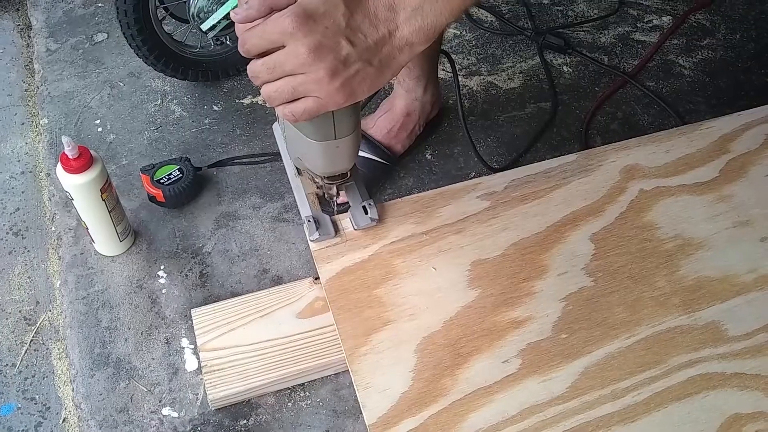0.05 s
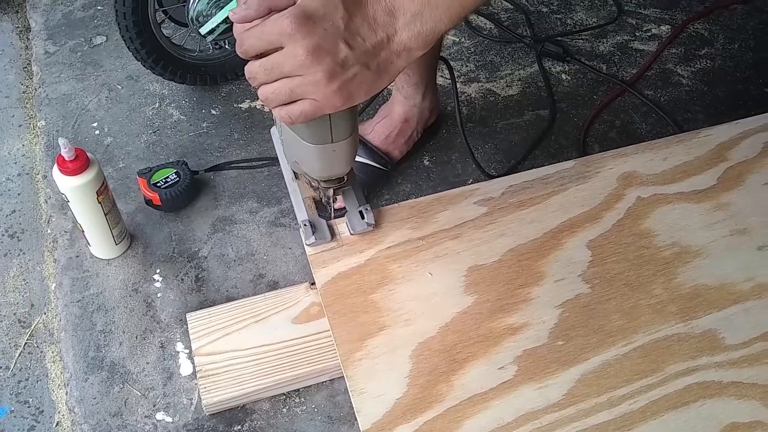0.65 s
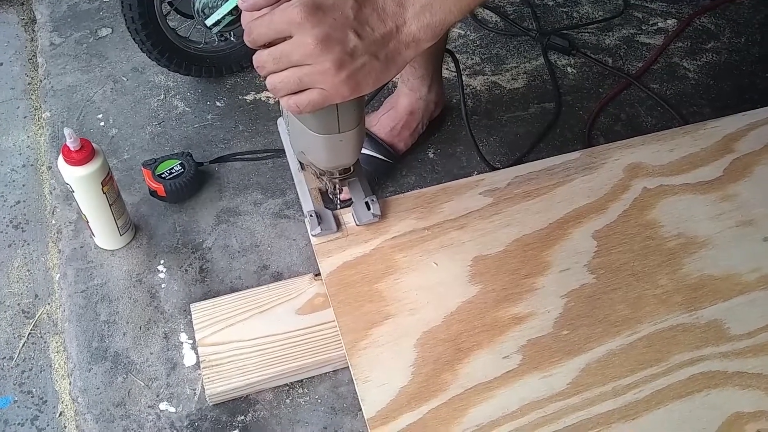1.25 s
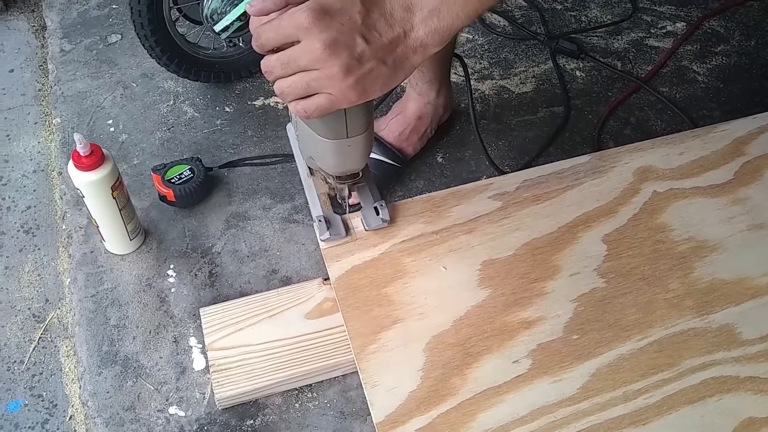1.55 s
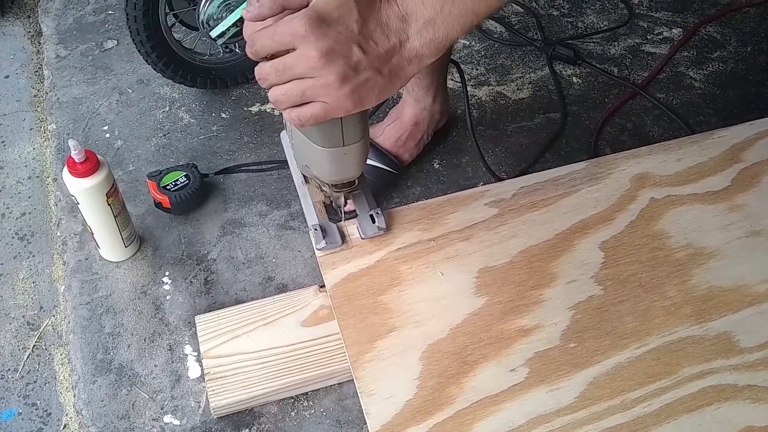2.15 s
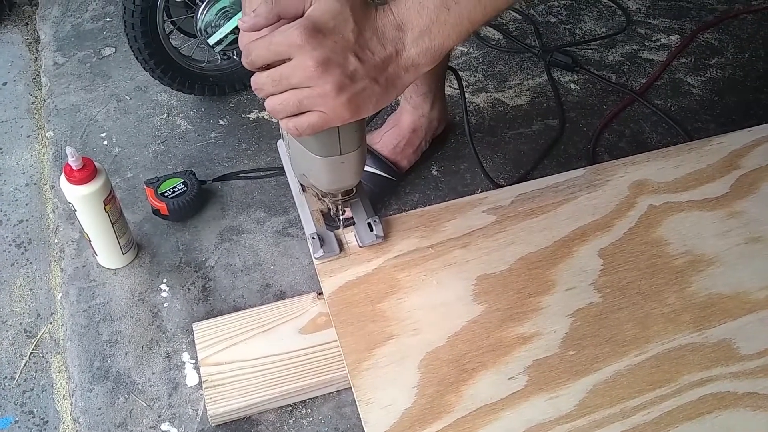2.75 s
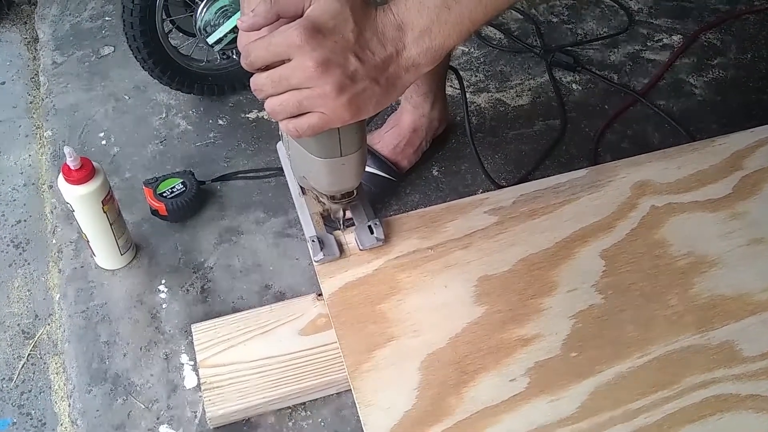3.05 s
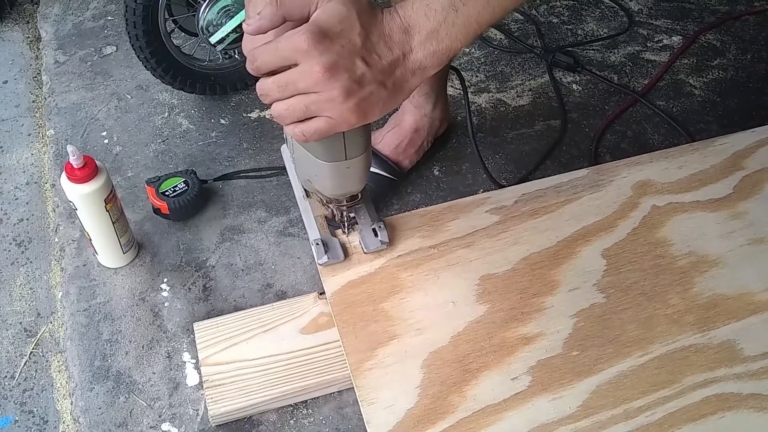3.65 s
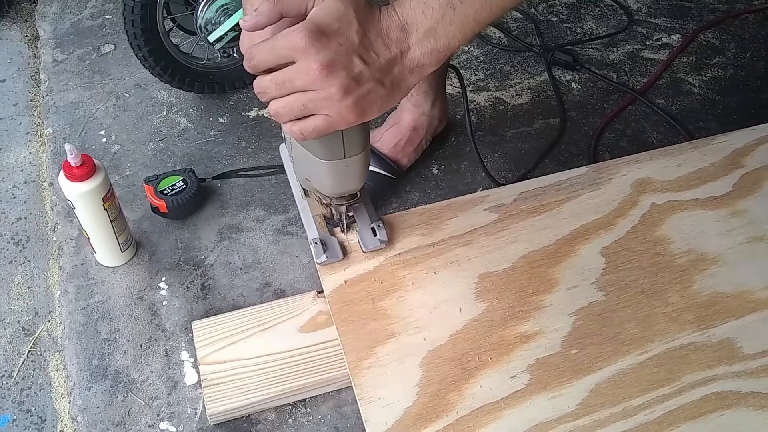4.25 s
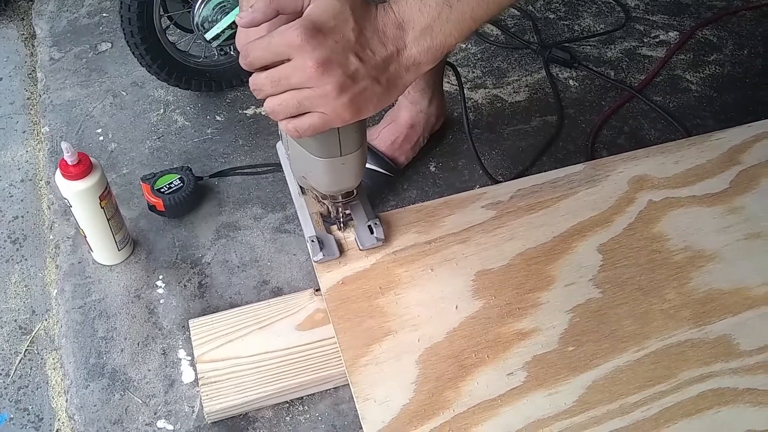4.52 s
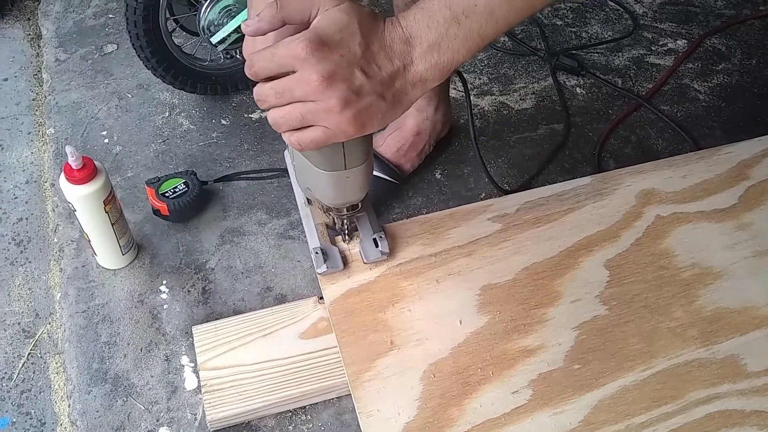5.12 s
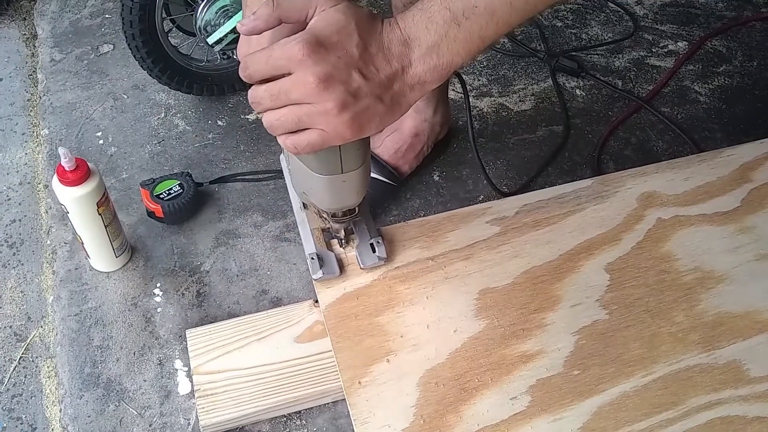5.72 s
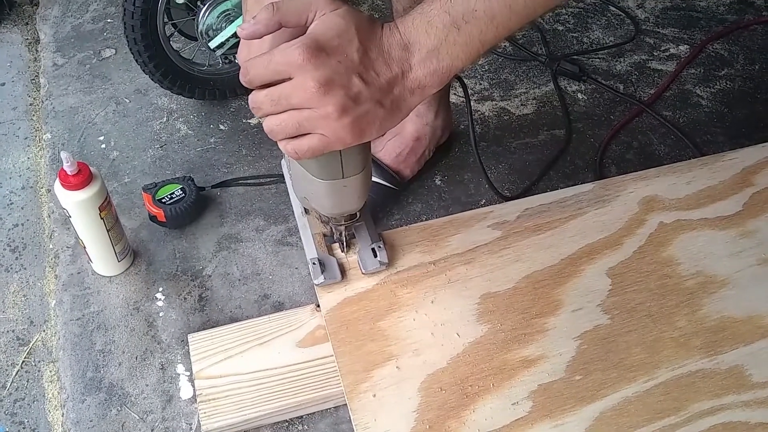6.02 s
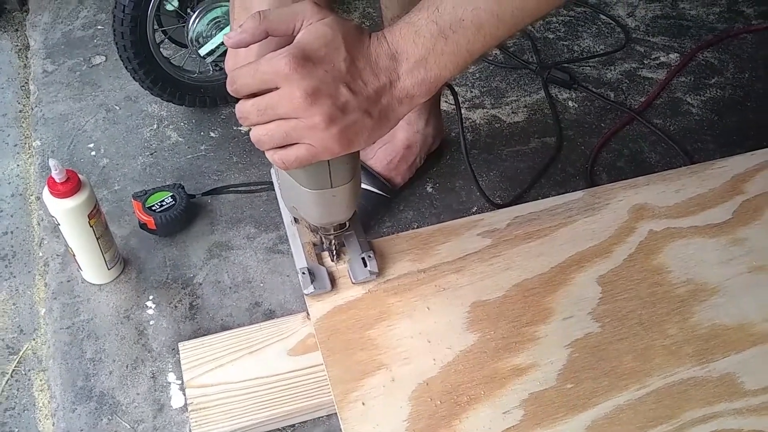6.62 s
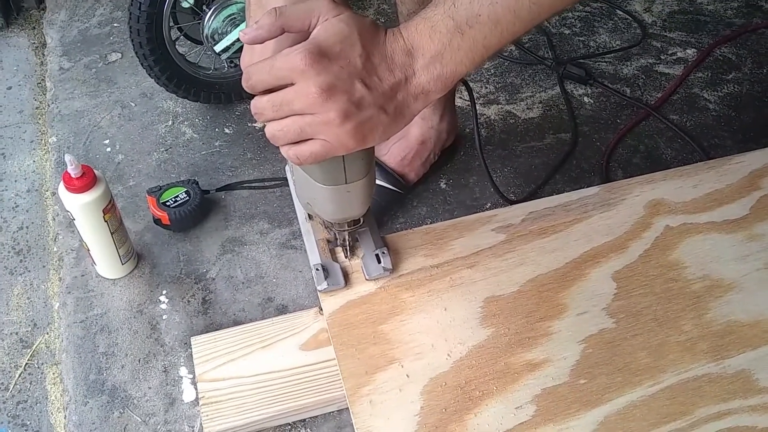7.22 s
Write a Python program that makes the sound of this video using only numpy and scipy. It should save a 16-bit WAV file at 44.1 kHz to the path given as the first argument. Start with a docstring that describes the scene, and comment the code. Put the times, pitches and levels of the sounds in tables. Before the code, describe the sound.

An electric jigsaw runs lightly against a plywood sheet with a rubbing hiss, a low hum and a rising whine. After about a second and a half the blade bites and starts a fast, thumping chatter, its teeth rasping and crackling while the steel shoe rings. Splinters crack off. The strokes slow midway, the pinched blade squeaks, then it speeds up again with a thin rattle. The sound is close, in a workshop.

```python
"""A rubbing hiss and a rising whine: an electric jigsaw runs lightly on a plywood sheet in a workshop.
At 1.6 s the blade bites. From then on, 9-16 times a second, its teeth rasp and crackle through the wood
and knock the sheet and the saw's steel shoe into ringing. Splinters crack off the veneer, and the blade
sometimes squeaks where the kerf pinches it. A nearby phone's stereo widening combs mid and side."""
import sys
import numpy as np
from scipy import signal
from scipy.fft import rfft, irfft
from scipy.io import wavfile

SR = 44100
rng = np.random.default_rng(int(sys.argv[2]) if len(sys.argv) > 2 else 0)


def dump_mix(stems):
    """Bounce the given channels to the path in sys.argv[1] as a 16-bit WAV at rate SR."""
    frames = np.atleast_2d(stems).T  # one column per channel
    limited = np.clip(frames, -1, 1)  # hard clip at full scale
    pcm = np.round(limited * 32767).astype(np.int16)
    wavfile.write(sys.argv[1], SR, pcm)


N = 329868
TIME_S, BINS_HZ = np.arange(N) / SR, np.arange(N // 2 + 1) * SR / N
BITE_S = 1.6
WOOD_BAND_HZ, TEETH_BAND_HZ = (450, 1500), (7000, 13000)


def undb(db):
    """Decibels to gain."""
    return 10 ** (np.asarray(db) / 20)


def over_time(table, column=1):
    """Table column interpolated at every sample."""
    table = np.array(table, float)
    return np.interp(TIME_S, table[:, 0], table[:, column])


def over_hz(table, column=1):
    """Table column interpolated at every bin, in log frequency."""
    table = np.array(table, float)
    return np.interp(np.log(BINS_HZ + 1), np.log(table[:, 0]), table[:, column])


def add(out, start_s, x):
    """Mix x into out at start_s."""
    i = int(start_s * SR)
    out[..., i:i + x.shape[-1]] += x[..., :max(N - i, 0)]


def tint(x, spectrum, band_hz):
    """Colour white noise; unit power in gives unit power inside the band."""
    gain = undb(over_hz(spectrum))
    in_band = (BINS_HZ > band_hz[0]) & (BINS_HZ < band_hz[1])
    return irfft(rfft(x) * gain / np.sqrt(np.mean(gain ** 2 * in_band)), N)


def walk(rate_hz):
    """Smooth random signal, spread near 1."""
    return 1.44 * np.interp(TIME_S * rate_hz, np.arange(N // 8), rng.standard_normal(N // 8))


def grit(grain_db, rate_hz):
    """Stereo noise, both channels broken into the same short grains."""
    grains = undb(grain_db * np.clip(walk(rate_hz), -3, 3))
    return rng.standard_normal((2, N)) * grains / np.sqrt(np.mean(grains ** 2))


def rough_tone(hz, flutter_hz):
    """Narrow-band noise around a pitch curve."""
    phase = 2 * np.pi * np.cumsum(hz) / SR
    return walk(flutter_hz) * np.cos(phase) + walk(flutter_hz) * np.sin(phase)


def bursts(times_s, levels_db, lead_s, rise_s, hold_s, fall_s, tail_db, tail_s):
    """Envelope of bursts, each starting lead_s early: rise, hold, fast fall plus a faint tail."""
    t, out = np.arange(SR // 8) / SR, np.zeros(N)
    after_s = np.maximum(t - hold_s, 0)
    decay = np.exp(-after_s / fall_s) + undb(tail_db) * np.exp(-after_s / tail_s)
    shape = np.minimum(t / rise_s, 1) * decay
    for at_s, db in zip(times_s, levels_db):
        add(out, at_s - lead_s, undb(db) * shape)
    return out


def ring(force, modes, spread_rad):
    """Damped modes; neighbours reach the two channels with opposite phase offsets."""
    t, response = np.arange(SR // 2) / SR, 0
    for k, (hz, db, t60_s) in enumerate(modes):
        offset = (-1) ** k * spread_rad * np.array([[1], [-1]])
        decay = np.exp(-np.log(1000) * t / t60_s)
        response = response + undb(db) * decay * np.cos(2 * np.pi * hz * t + offset)
    return signal.fftconvolve(np.atleast_2d(force), response, axes=1)[:, :N]


def diffuse(x, share, decay_s):
    """Countless high modes turn a share of the power into a short, dense ring."""
    t = np.arange(SR // 6) / SR
    tail = rng.standard_normal((1, len(t))) * np.exp(-t / decay_s)
    wet = signal.fftconvolve(x, tail, axes=1)[:, :N]
    return np.sqrt(1 - share) * x + np.sqrt(share / np.sum(tail ** 2)) * wet


# Blade speed, sagging as the kerf pinches. Each row: time in seconds, strokes per second.
STROKE_RATE = [(1.6, 12.52), (2.84, 12.83), (2.93, 12.3), (3.07, 12.2), (3.25, 11.2), (3.43, 10.1),
               (3.78, 8.74), (4.3, 10.97), (4.72, 13.22), (5.38, 14.33), (5.63, 13.38), (5.78, 14.75),
               (6.24, 14.71), (6.58, 15.36), (7.48, 15.58)]

def stroke_count():
    """Strokes since the bite; whole numbers fall on the knocks."""
    return np.cumsum(over_time(STROKE_RATE) * (TIME_S >= BITE_S)) / SR


def swing_db(depth_db, lag_rad):
    """Level swing, one cycle per stroke, from the bite on."""
    return (TIME_S > BITE_S) * depth_db * np.cos(2 * np.pi * stroke_count() - lag_rad)


def stroke_window(centre, width):
    """Bell-shaped window in each stroke; centre and width are fractions of a stroke."""
    return (TIME_S > BITE_S) * np.exp(-((stroke_count() % 1 - centre) / width) ** 2)


# Hum partials. Each row: frequency in Hz, level in dB.
HUM_PARTIALS = [(55.5, -59), (111, -62), (167, -45.5), (293, -46.5)]

def hum(gain_db=-3):
    """The lightly loaded saw hums, wavering, until the blade bites."""
    warped_s = np.cumsum(1 + 0.013 * walk(18)) / SR
    gate = np.clip((BITE_S - TIME_S) / 0.032 + 1, 0, 1)
    partials = sum(undb(db + gain_db + 0.83 * walk(10.3)) * np.sin(2 * np.pi * hz * warped_s)
                   for hz, db in HUM_PARTIALS)
    return np.sqrt(2) * gate * partials


# Motor run-up. Each row: time in seconds, pitch in Hz, level in dB.
RUN_UP = [(0, 525, -62), (.19, 560, -35.5), (.31, 572, -54), (.41, 631, -57), (.62, 694, -47),
          (.66, 765, -44), (.695, 790, -29), (.73, 812, -51), (.82, 847, -55), (.95, 859, -47),
          (1.3, 898, -43), (1.6, 925, -41), (1.7, 940, -80)]

def motor_whine(gain_db=-2, octave_db=-5, waver=0.00695, roughness=0.71):
    """The whine climbs as the motor gathers speed; its octave fades as the blade nears the wood."""
    hz = over_time(RUN_UP) * (1 + waver * walk(40.5))
    phase = 2 * np.pi * np.cumsum(hz) / SR
    octave = undb(octave_db) * np.clip((BITE_S - TIME_S) / 0.34, 0, 1) * np.sin(2 * phase)
    db = over_time(RUN_UP, 2) + gain_db + 1.2 * walk(24.2)
    return undb(db) * (np.sqrt(2) * (np.sin(phase) + octave) + roughness * rough_tone(hz, 60.06))


# Rattle in the blade guide. Each row: time in seconds, level in dB.
RATTLE_LEVELS = [(4.7, -62), (5.25, -47.5), (6.2, -52), (7.48, -53.5)]

def blade_rattle(hz=3200.0):
    """Freed by the kerf, the blade rattles in its guide and rings with every stroke."""
    db = over_time(RATTLE_LEVELS) + swing_db(5, lag_rad=-0.11) + 4.9 * walk(250)
    return undb(db) * rough_tone(np.full(N, hz), flutter_hz=900)


# Rubbed blade resonance. Each row: time in seconds, pitch in Hz, level in dB.
BLADE_RESONANCE = [(0, 10380, -37), (1.55, 9900, -36.5), (1.7, 10080, -69), (3.8, 9800, -60),
                   (4.25, 8180, -44), (5.1, 8200, -44.5), (6.8, 8280, -35.5), (7.48, 7710, -38)]

def blade_sizzle(gain_db=-1.5):
    """Rubbing sets one blade resonance singing, most near the end of each stroke."""
    hz = over_time(BLADE_RESONANCE)
    db = over_time(BLADE_RESONANCE, 2) + gain_db + swing_db(4.5, lag_rad=-0.24) + 3 * walk(150)
    return undb(db) * np.array([rough_tone(hz, flutter_hz=1700) for _ in range(2)])


# Friction as the saw is pushed along. Each row: time in seconds, rub in dB, hiss in dB.
FRICTION_LEVELS = [(0, -30.5, -35), (0.17, -27.5, -31.5), (0.245, -30, -30.5), (0.32, -27, -26),
                   (0.38, -30, -32), (0.46, -32, -29.5), (0.6, -28.5, -28.5), (0.705, -31.5, -26.5),
                   (0.735, -35.5, -34), (1.13, -31, -28), (1.42, -33.5, -30), (1.58, -29, -25),
                   (1.63, -38, -35), (3, -38.5, -32), (3.68, -35, -30), (3.85, -39.5, -35.5),
                   (5.38, -35, -30.5), (5.6, -37, -34), (5.95, -33.5, -30), (6.4, -35.5, -32),
                   (6.88, -31.5, -27), (7.48, -33, -30.5)]
# Rub and hiss spectra. Each row: frequency in Hz, density in dB.
RUB_SPECTRUM = [(25, -14), (60, -15), (100, -5), (130, -9), (165, -1), (260, 7.5), (380, 0), (520, 3),
                (750, 2.5), (1100, 2.5), (1550, 1.5), (2000, 3), (2900, -1.5), (4000, -11), (6000, -19)]
HISS_SPECTRUM = [(1500, -32), (2100, -37), (2750, 2.5), (3500, 0.5), (4200, -0.7), (5500, 1.5), (7000, 0.5),
                 (8300, 0), (10800, 3), (12500, -0.5), (13500, -3.5), (14300, -28)]

def friction(gain_db=-1, return_db=4, fast_strokes_per_s=14):
    """The saw rubs on the wood, teeth and fan hiss; a fast blade also scrapes on its way back."""
    fast = np.clip((over_time(STROKE_RATE) - fast_strokes_per_s) / 0.1, 0, 1)
    scrape_db = return_db * fast * stroke_window(centre=0.663, width=0.098)
    rub_db = over_time(FRICTION_LEVELS) + swing_db(2.5, lag_rad=0.038) + scrape_db + 1.24 * walk(45)
    hiss_db = over_time(FRICTION_LEVELS, 2) + swing_db(1.26, lag_rad=0.073) + 1.56 * walk(60)
    rub = tint(grit(1.2, 500) * undb(rub_db + gain_db), RUB_SPECTRUM, WOOD_BAND_HZ)
    hiss = tint(grit(1.67, 1200) * undb(hiss_db + gain_db), HISS_SPECTRUM, TEETH_BAND_HZ)
    return diffuse(rub + hiss, share=0.11, decay_s=0.018)


# Sheet bending modes, then the higher modes of shoe and sheet.
# Each row: frequency in Hz, level in dB, T60 in seconds.
SHEET_MODES = [(165, 9, 0.31), (188.6, 5.5, 0.22), (227, 4.5, 0.14), (250, -4.5, 0.36), (280.3, 7, 0.16)]
SHOE_MODES = [(336, -1, 0.12), (381, 0.5, 0.15), (433, -2, 0.21), (555, 2, 0.11), (591, 0, 0.082),
              (641, -5, 0.17), (672, -3.5, 0.13), (770, -22, 0.04), (911, -5, 0.13), (1120, 2.5, 0.06),
              (1210, -22, 0.055), (1515, 4.5, 0.014)]
# Chatter of sheet against shoe. Each row: time in seconds, force in dB.
JUDDER_FORCE = [(0, -38.5), (.75, -55), (1.45, -47), (1.7, -34.5), (3.25, -30.5), (3.52, -28.5),
                (3.7, -31.5), (3.8, -30.5), (4.6, -38), (5.3, -32.5), (5.7, -37), (7.48, -31.5)]

def judder(gain_db=-2, shoe_db=-7, clatter_db=-11, clatter_hz=440):
    """The sheet chatters under the shoe; hard blows lift the shoe and add a dry, woody clatter."""
    force_db = over_time(JUDDER_FORCE)
    blows = grit(3.5, 250)[0] * undb(force_db + gain_db + swing_db(4, lag_rad=1.38))
    sheet = ring(blows, SHEET_MODES, spread_rad=0.59)
    shoe = ring(blows, SHOE_MODES, spread_rad=1.0)
    hard_blows = blows * np.clip((force_db - np.median(force_db)) / 8, 0, 1)
    band = signal.iirpeak(clatter_hz, Q=1.05, fs=SR)
    clatter = signal.lfilter(*band, signal.lfilter(*band, hard_blows))
    parts = (sheet, 0), (shoe, shoe_db), (clatter, clatter_db)
    return np.std(blows) * sum(undb(db) * part / np.std(part) for part, db in parts)


# Note of the steel shoe. Each row: time in seconds, level in dB.
CLANG_LEVELS = [(1.6, -28.5), (1.68, -36.5), (1.8, -32.5), (2.4, -29), (3.1, -31.5), (3.5, -34.5),
                (3.8, -33), (4.1, -42), (4.7, -36.5), (5.5, -46), (7.48, -48)]

def shoe_clang(times_s, hz=936, scatter_hz=3.5, lead_s=0.006, rise_s=0.0062, t60_s=0.18, free_s=0.09):
    """Each knock rings one clear note from the shoe until it settles back on the wood."""
    t, out = np.arange(SR // 10) / SR, np.zeros(N)
    amplitude = np.sqrt(2) * undb(over_time(CLANG_LEVELS))
    choke = np.exp(-np.maximum(t - free_s, 0) / 0.016)
    shape = np.minimum(t / rise_s, 1) * np.exp(-np.log(1000) * t / t60_s) * choke
    for at_s, (detune, phase) in zip(times_s, rng.standard_normal((len(times_s), 2))):
        note = np.sin(2 * np.pi * ((hz + scatter_hz * detune) * t + phase))
        add(out, at_s - lead_s, amplitude[int(at_s * SR)] * shape * note)
    return out


def chirp_rows(times_s, from_s=5.75, lead_s=0.012, length_s=0.00825, db=-25.5, hz=7980, scatter_hz=279):
    """Running freely, the blade chirps faintly ahead of each knock. Rows as in PINCHES."""
    late_s = times_s[times_s > from_s]
    return [(at_s - lead_s, length_s, db + scatter_db, hz + scatter_hz * first, hz + scatter_hz * last)
            for at_s, (scatter_db, first, last) in zip(late_s, rng.standard_normal((len(late_s), 3)))]


# Kerf pinches. Each row: start in seconds, length in seconds, level in dB, first and last pitch in Hz.
PINCHES = [(3.9775, 0.0081, -15.5, 8840, 9850), (4.0805, 0.0081, -11.5, 8900, 9500),
           (4.1775, 0.0066, -6, 8520, 7900), (4.2703, 0.0067, -7, 8200, 8150),
           (4.358, 0.0076, -9, 8960, 7840), (4.4435, 0.0067, -8.5, 10090, 6940),
           (4.5268, 0.0061, -7.5, 9800, 7480), (4.608, 0.0058, -10, 10900, 7670),
           (4.686, 0.0055, -5.5, 9130, 8070), (4.762, 0.0061, -6.5, 10270, 7200),
           (4.8375, 0.005, -6, 8930, 7950), (5.9865, 0.0038, -11.5, 9000, 8050),
           (6.056, 0.0045, -16, 9000, 8300), (7.047, 0.0045, -13.5, 8200, 7850)]
# Scrape within a squeak. Each row: frequency in Hz, density in dB.
SCRAPE_SPECTRUM = [(3000, -28), (6500, -18), (7600, 7), (9800, -4), (11500, -20), (14000, -17)]

def squeaks(times_s, gain_db=-3, waver_hz=230, beat_hz=720, partner_db=-10, scrape_db=-13, echo_db=-11):
    """The pinched blade screeches in two beating modes: it swells, bends, snaps off and echoes."""
    rows = PINCHES + chirp_rows(times_s)
    tone, grip = np.zeros(N), np.zeros(N)
    for start_s, length_s, db, first_hz, last_hz in rows:
        progress = np.linspace(0, 1, int(length_s * SR))
        knots = rng.standard_normal(10)
        waver = np.interp(progress, np.linspace(0, 1, len(knots)), knots)
        hz = first_hz + (last_hz - first_hz) * progress + waver_hz * waver
        release = np.minimum((1 - progress) * length_s / 0.0007, 1)
        swell = undb(db + gain_db) * np.minimum(progress / 0.62, 1) ** 1.4 * release
        phase = 2 * np.pi * np.cumsum(hz) / SR
        beat = 2 * np.pi * (beat_hz * length_s * progress + knots[0])
        partner = undb(partner_db) * np.sin(phase + beat)
        add(tone, start_s, np.sqrt(2) * swell * (np.sin(phase) + partner))
        add(grip, start_s, swell)
    grip_flutter = 1 + 0.35 * np.tanh(walk(2500))
    scrape = tint(grip * rng.standard_normal(N), SCRAPE_SPECTRUM, TEETH_BAND_HZ)
    direct = tone * grip_flutter + undb(scrape_db) * scrape
    echo = np.vstack([diffuse(direct[None], share=1, decay_s=0.06) for _ in range(2)])
    return direct * np.array([[1.05], [0.55]]) + undb(echo_db) * echo


# Splinter cracks. Each row: time in seconds, length in seconds, level in dB.
CRACKS = [(1.598, 0.0014, -16), (1.679, .0012, -27), (1.7495, 0.0011, -12.5), (1.8305, .0015, -14),
          (2.067, .002, -21), (2.2255, 0.0022, -14.5), (2.307, .002, -19), (2.386, .0012, -15),
          (2.462, .0015, -19), (2.701, .002, -19), (2.778, .002, -16), (2.854, .003, -18),
          (2.937, .003, -20), (3.019, 0.0056, -18.5), (3.189, .0035, -11), (3.194, 0.0037, -17),
          (3.509, .0012, -15), (3.5268, 0.0023, -11), (3.558, .0012, -17), (3.932, .0012, -18),
          (5.432, .0012, -15), (5.859, .0012, -16.5), (5.927, .0012, -16), (6.273, .0012, -14.5),
          (6.332, .0012, -20)]
# Breaking veneer. Each row: frequency in Hz, density in dB.
VENEER_SPECTRUM = [(800, -19), (2800, 1), (4300, -4), (6000, 3.5), (7800, 10), (9500, 6), (11300, 7),
                   (12800, 7.5), (14000, -17)]

def splinters():
    """Now and then a splinter cracks off the veneer."""
    cracks = sum(bursts([at_s], [db], lead_s=0.001, rise_s=0.0003, hold_s=length_s,
                        fall_s=0.00076, tail_db=-34, tail_s=0.004) for at_s, length_s, db in CRACKS)
    return tint(grit(2.6, 1500) * cracks, VENEER_SPECTRUM, TEETH_BAND_HZ)


def tooth_crackle(times_s, levels_db, drag_db=1.5, snap_db=8):
    """The teeth catch with a snap and break through the veneer in a dry spray of clicks."""
    drag = bursts(times_s, levels_db + drag_db, lead_s=0.0114, rise_s=0.00098, hold_s=0.0087,
                  fall_s=0.0029, tail_db=-10, tail_s=0.0064)
    snap = bursts(times_s, levels_db + snap_db, lead_s=0.01004, rise_s=0.00033, hold_s=0.00032,
                  fall_s=0.0011, tail_db=-30, tail_s=0.004)
    return tint(grit(3.6, 1500) * np.hypot(drag, snap), VENEER_SPECTRUM, TEETH_BAND_HZ)


# Tearing fibres. Each row: frequency in Hz, density in dB.
FIBRE_SPECTRUM = [(100, -5.5), (300, 4.5), (650, 6.5), (1100, 6), (1700, -4.5), (3000, -4), (5000, 2),
                  (9000, -36)]
# Teeth catch, sheet slaps shoe, sheet bounces. Each row: lead on the knock in seconds, level in dB.
STROKE_BLOWS = [(0.01, -16), (0.0036, -11.5), (0.0004, -18)]

def wood_rasp(times_s, levels_db, direct_db=-5, drive_db=-52):
    """Wood fibres tear; the tearing and three blows per stroke ring the modes of shoe and sheet."""
    drag = bursts(times_s, levels_db, lead_s=0.0098, rise_s=0.0011, hold_s=0.0087,
                  fall_s=0.0086, tail_db=-47, tail_s=0.015)
    tearing = tint(grit(0.73, 980) * drag, FIBRE_SPECTRUM, WOOD_BAND_HZ)
    blows = np.zeros(N)
    for at_s, db in zip(times_s, levels_db):
        for lead_s, blow_db in STROKE_BLOWS:
            add(blows, at_s - lead_s, undb([db + blow_db]))
    ringing = ring(undb(drive_db) * tearing + blows, SHOE_MODES, spread_rad=0.68)
    return undb(direct_db) * tearing + ringing


THUMP_HZ = 234.8

def thumps(times_s, levels_db, pitches_hz, gain_db=-5.5, lead_s=0.0023, bounce_s=0.01446, bounce_db=-15):
    """Each stroke lifts the sheet and drops it with one bounce; a longer shove thumps lower."""
    t, force = np.arange(-SR // 40, SR // 40) / SR, np.zeros(N)
    for at_s, db, hz in zip(times_s, levels_db, pitches_hz):
        width_s = 0.0065 * (THUMP_HZ / hz) ** 0.77
        shove = np.exp(-(t / width_s) ** 2) * np.cos(2 * np.pi * hz * t)
        shove /= np.sum(np.abs(shove))
        start_s = at_s - lead_s + t[0]
        add(force, start_s, undb(db) * shove)
        add(force, start_s + bounce_s, undb(db + bounce_db) * shove)
    damping_db = -4 * stroke_window(centre=0.71, width=0.12)  # the shoe presses on the sheet again
    return undb(gain_db + damping_db) * ring(force, SHEET_MODES, spread_rad=0.5)


# Stroke strength. Each row: time in seconds, then thump, rasp and crackle in dB.
STROKE_LEVELS = [(1.6, -34, -26, -25), (1.68, -25.5, -29, -27.5), (1.78, -14.5, -27.5, -25.5),
                 (2.42, -16.5, -25, -27), (2.85, -14.5, -22.5, -24), (3.18, -15, -22.5, -25.5),
                 (3.3, -13.5, -29, -26.5), (3.47, -9.5, -25.5, -25.5), (3.57, -12, -33, -28),
                 (3.68, -11, -23.5, -29.5), (3.79, -12, -32, -28.5), (3.9, -13, -39, -32),
                 (4.0, -16.5, -33, -29), (4.3, -15, -37, -37), (4.7, -18.5, -46, -38),
                 (4.95, -12, -34.5, -38), (5.5, -8, -28, -23.5), (5.66, -16.5, -55, -39),
                 (6.0, -11, -40, -28), (6.4, -15, -37, -32.5), (6.95, -12, -34, -37),
                 (7.48, -12.5, -35, -26)]
# Stray jolts of the pinched blade.
# Each row: time in seconds, thump in dB, thump pitch in Hz, rasp in dB, crackle in dB.
STRAY_JOLTS = [(1.52, -23, 242, -28, -35), (3.51, -17, 180, -41, -33), (3.533, -15.5, 260, -23, -32),
               (3.636, -16, 260, -24.5, -28)]

def blade_knocks(scatter_db=(1, 1.5, 0.9), easy_strokes_per_s=12.78, sag_hz_per_lost_stroke=11.9):
    """One knock per stroke, plus the jolts; a slowed blade thumps lower. Rows as in STRAY_JOLTS."""
    count = stroke_count()
    at = np.searchsorted(count, np.arange(np.ceil(count[-1])), side="right")
    levels_db = np.column_stack([over_time(STROKE_LEVELS, column)[at] for column in (1, 2, 3)])
    levels_db += np.array(scatter_db) * rng.standard_normal(levels_db.shape)
    thump_db, rasp_db, crackle_db = levels_db.T
    lost_strokes_per_s = np.maximum(easy_strokes_per_s - over_time(STROKE_RATE)[at], 0)
    thump_hz = THUMP_HZ - sag_hz_per_lost_stroke * lost_strokes_per_s
    return np.vstack([np.column_stack([at / SR, thump_db, thump_hz, rasp_db, crackle_db]), STRAY_JOLTS])


def scene(low_cut_hz=132):
    """The whole cut in stereo; the sheet radiates little below its lowest mode."""
    times_s, thump_db, thump_hz, rasp_db, crackle_db = blade_knocks().T
    radiation = signal.butter(4, low_cut_hz, "high", fs=SR, output="sos")
    sheet = signal.sosfiltfilt(radiation, thumps(times_s, thump_db, thump_hz) + judder())
    teeth = wood_rasp(times_s, rasp_db) + tooth_crackle(times_s, crackle_db)
    teeth = diffuse(teeth, share=0.25, decay_s=0.018)
    cracks = diffuse(splinters(), share=0.2, decay_s=0.027)
    saw = shoe_clang(times_s) + friction() + blade_sizzle() + blade_rattle() + motor_whine()
    return sheet + teeth + cracks + saw + squeaks(times_s) + hum()


# Stereo widening. Each row: frequency in Hz, side minus mid in dB, comb depth in dB.
WIDENING = [(61.4, 3, 2), (177, -6, 2.5), (700, -10.5, 0.5), (1180, 7.5, 29), (1550, -1.5, 1.5),
            (2334, 6.5, 10.5), (3580, -7, 3.5), (4360, -3.5, 12), (6100, 2.5, 8.5), (9600, -4, 10),
            (10200, 1, 4.5), (13400, 1, 0)]

def record(dry, comb_hz=2238, null_hz=2290, null_width_hz=200, left_db=3.5, ceiling=0.85, top_hz=14350):
    """The phone combs mid and side in turn, nulls one mid band, rounds peaks and cuts the top."""
    mid, side = rfft(dry[0] + dry[1]) / 2, rfft(dry[0] - dry[1]) / 2
    comb_rad = 2 * np.pi * BINS_HZ / comb_hz
    # The lag between the microphones leaks treble from mid to side, a quarter cycle off.
    leak = np.clip(BINS_HZ / comb_hz - 1, 0, 1) * np.sin(comb_rad)
    side = side * np.sqrt(1 - leak ** 2) - 1j * leak * mid
    side_ratio = undb(over_hz(WIDENING) + over_hz(WIDENING, 2) * np.cos(comb_rad))
    power_trim = np.sqrt(2 / (1 + side_ratio ** 2))
    null = undb(-34 / (1 + np.abs((BINS_HZ - null_hz) / null_width_hz) ** 14))
    mid, side = mid * power_trim * null, side * power_trim * side_ratio
    lean = undb(left_db * np.exp(-((BINS_HZ - 8500) / 2000) ** 2) / 2)
    wide = irfft(np.array([(mid + side) * lean, (mid - side) / lean]), N)
    rounded = wide / (1 + (wide / ceiling) ** 6) ** (1 / 6)
    return irfft(rfft(rounded) / np.sqrt(1 + (BINS_HZ / top_hz) ** 260), N)


dry = scene()
out = record(dry)
dump_mix(out)
```